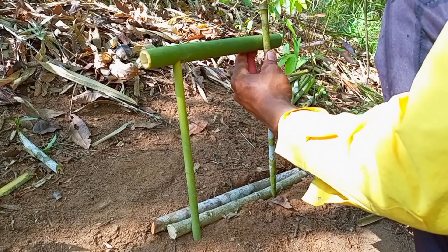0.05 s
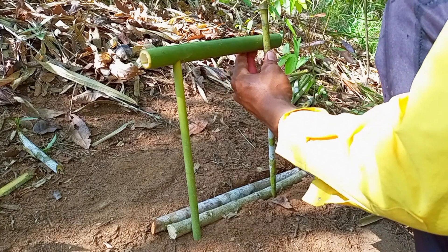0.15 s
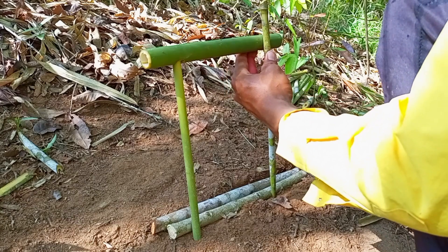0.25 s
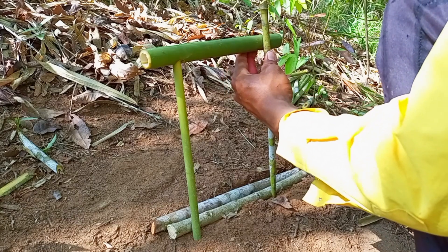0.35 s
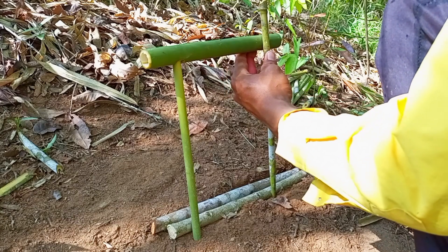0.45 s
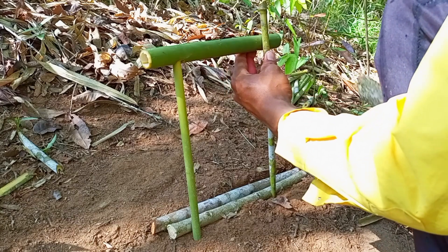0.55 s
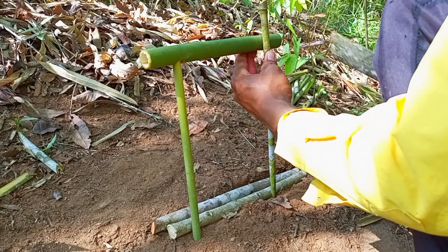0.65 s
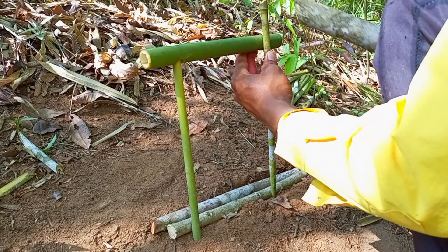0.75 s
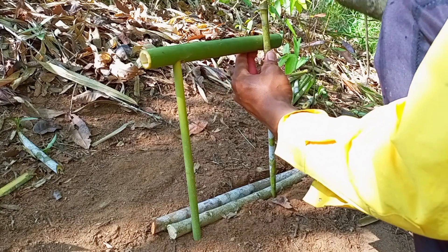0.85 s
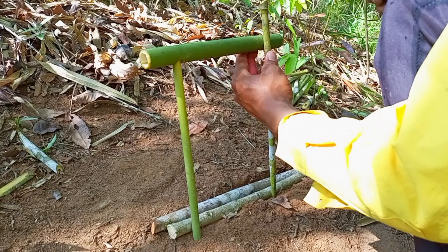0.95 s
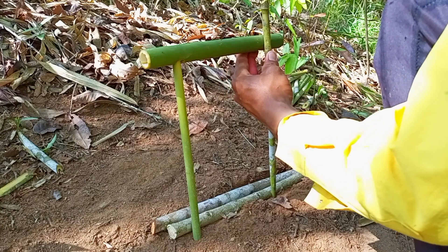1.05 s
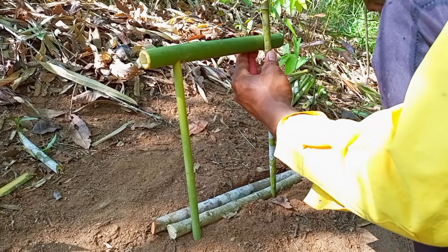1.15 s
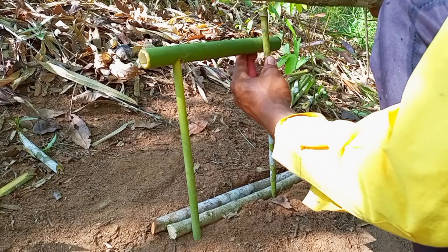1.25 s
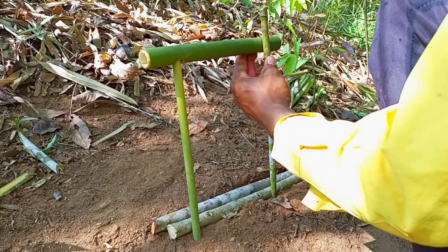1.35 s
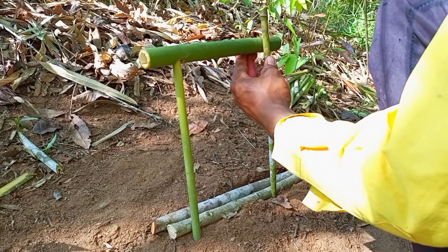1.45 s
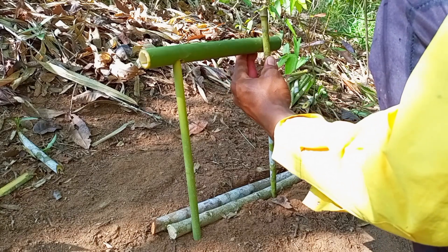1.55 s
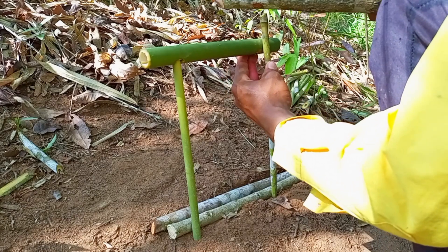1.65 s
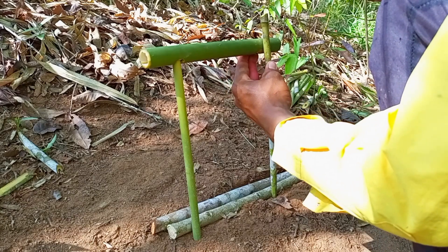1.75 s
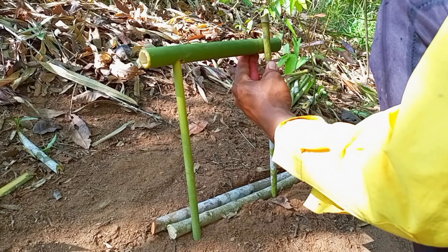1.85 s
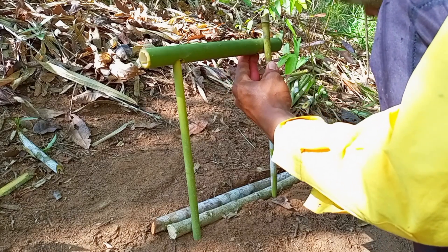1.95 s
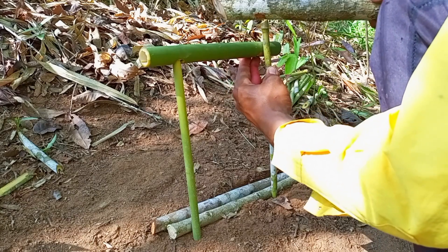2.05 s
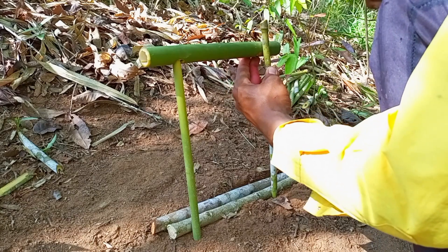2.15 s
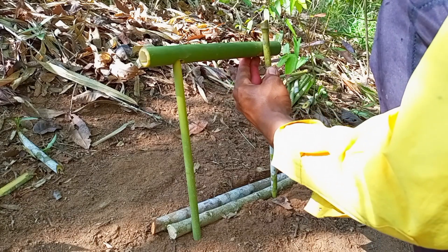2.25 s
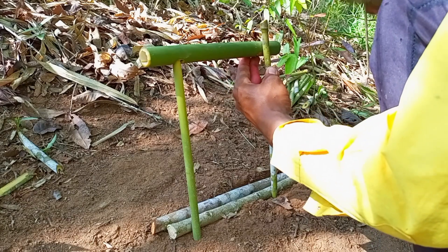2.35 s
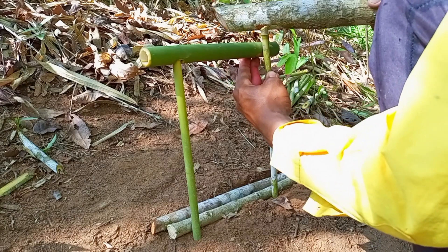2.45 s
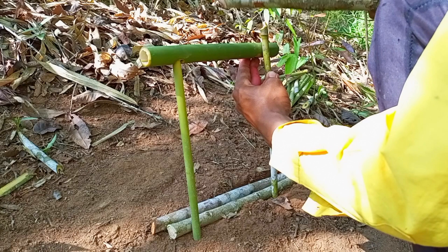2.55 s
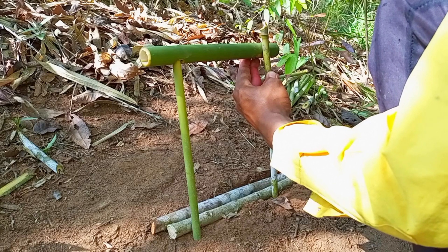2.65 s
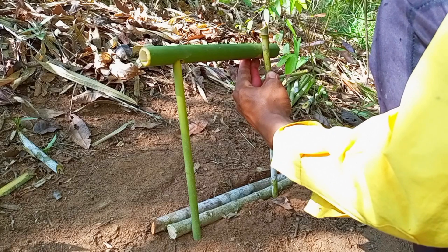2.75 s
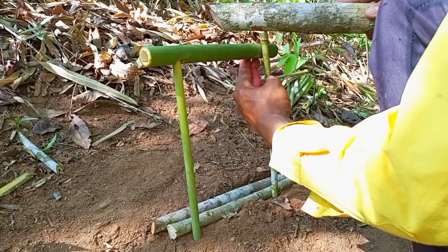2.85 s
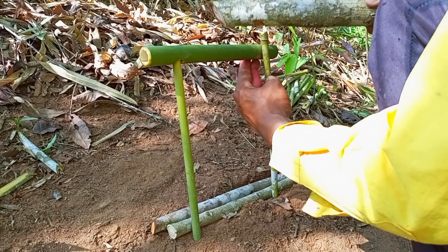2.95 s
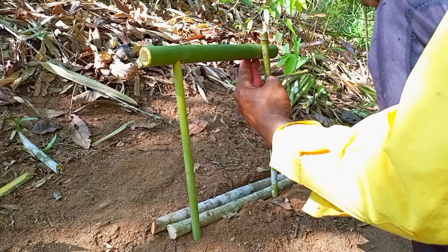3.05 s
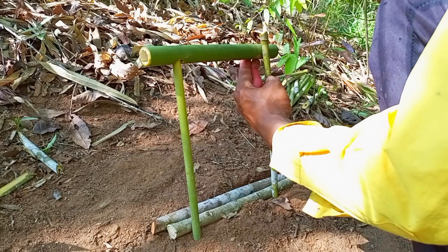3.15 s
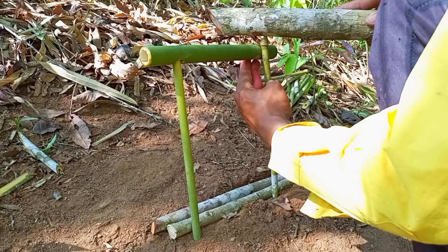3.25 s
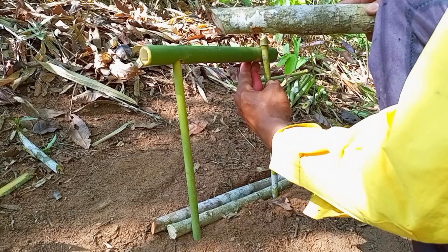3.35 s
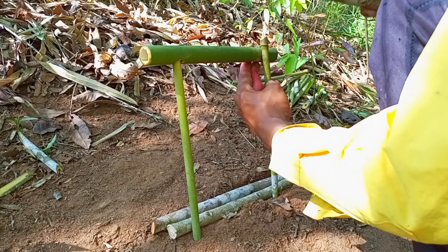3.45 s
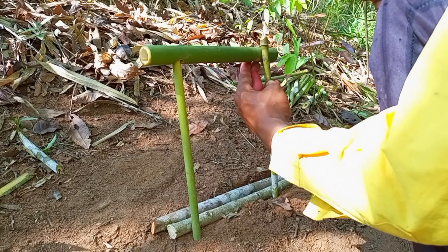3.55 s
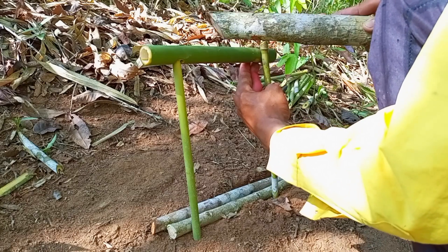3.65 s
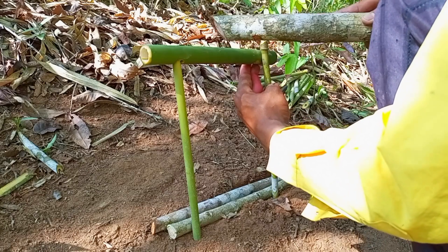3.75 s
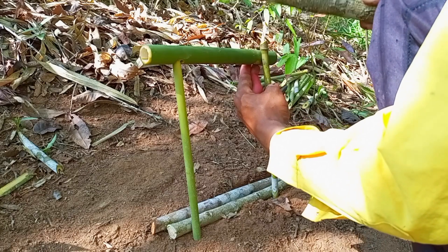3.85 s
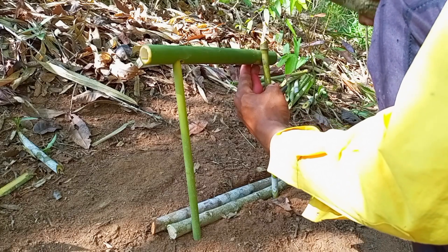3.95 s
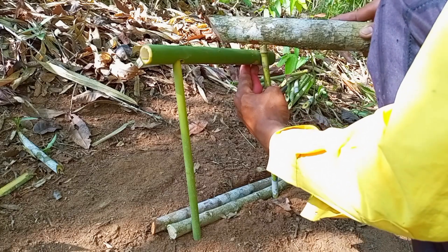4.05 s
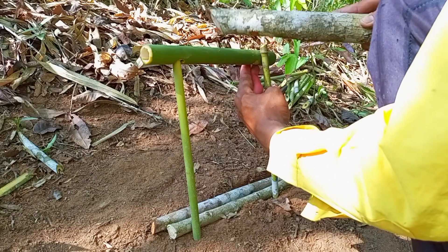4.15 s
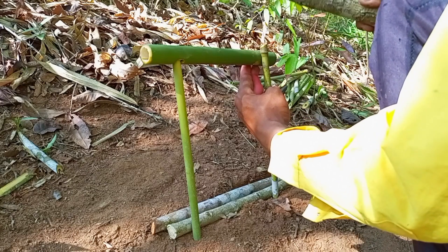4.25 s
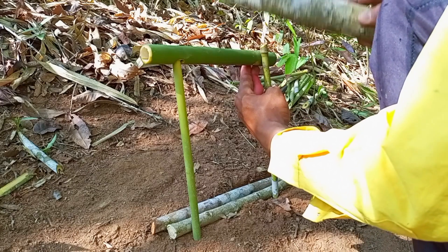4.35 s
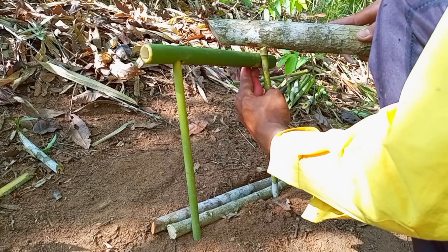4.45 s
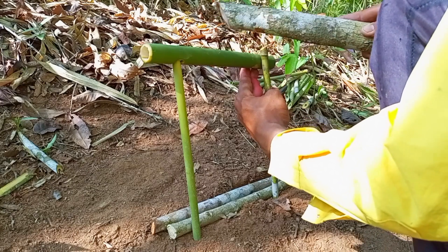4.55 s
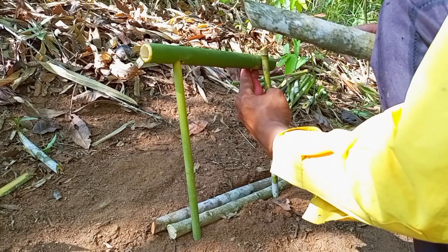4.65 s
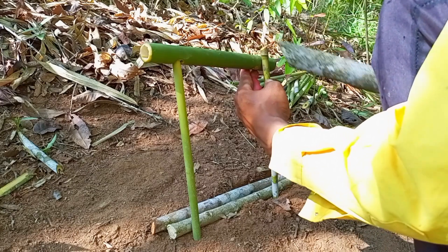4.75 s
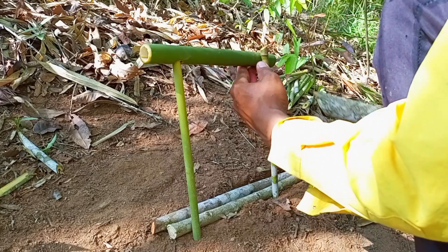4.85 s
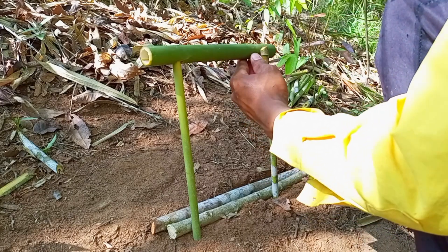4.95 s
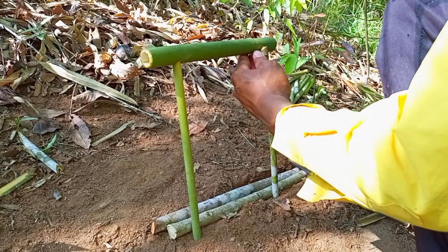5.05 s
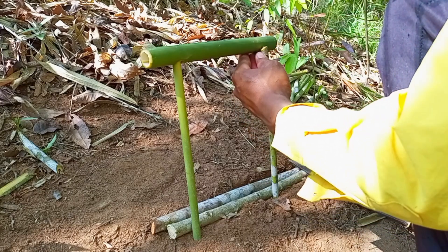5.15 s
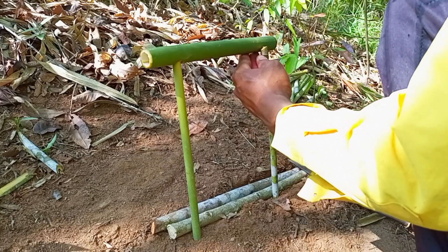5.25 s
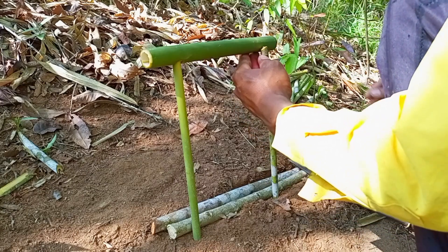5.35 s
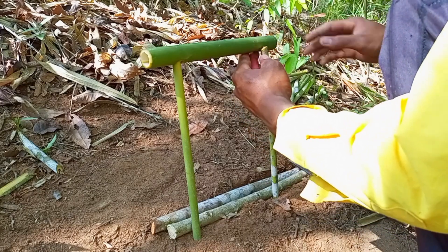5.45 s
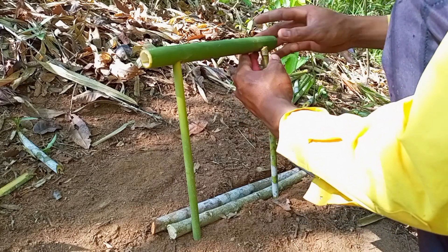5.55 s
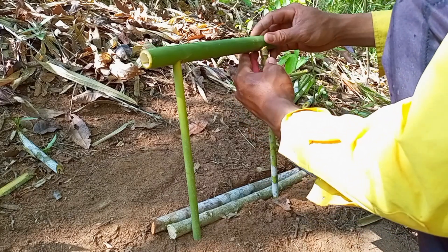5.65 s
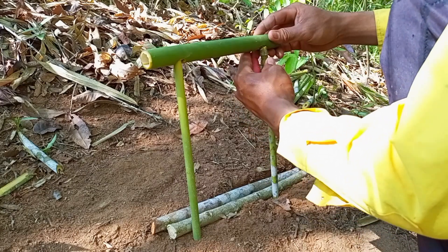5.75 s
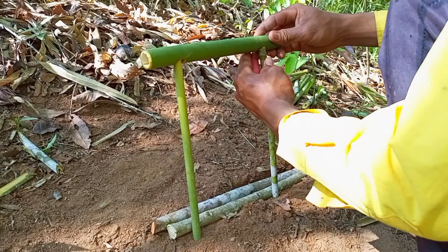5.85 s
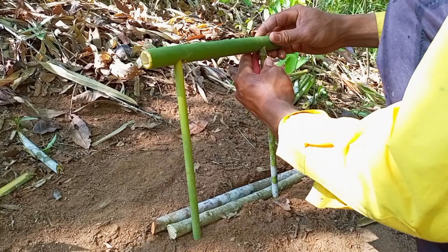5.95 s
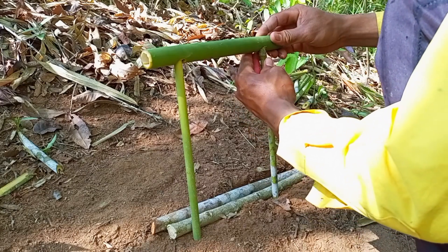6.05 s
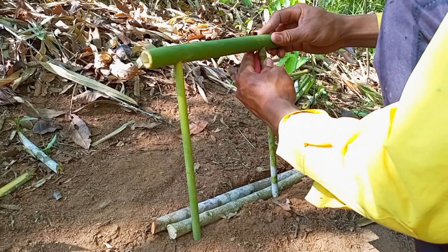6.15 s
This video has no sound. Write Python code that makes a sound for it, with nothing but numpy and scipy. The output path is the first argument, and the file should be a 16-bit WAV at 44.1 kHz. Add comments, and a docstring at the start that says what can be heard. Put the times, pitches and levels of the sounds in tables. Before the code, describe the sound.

In a forest filled with a steady, high cicada drone, nine close, evenly spaced knocks of wood on bamboo ring out with hardly any echo. They start lighter, then gain force and a deeper thud, with small ticks and dull bumps from a loose crossbar. The hammering stops, and the crossbar slips over the stake with a short scrape and a click. Distant birds call very faintly.

```python
"""Nine even knocks, each a hollow clack over a thud, stand out from a steady hiss of cicadas.
A wooden club drives a green bamboo stake of a small frame into forest soil: each impact excites
damped modes of the cane, and the stake's sway against the soil gives the thud. The held crossbar
rattles and bumps after the blows; after a faint ringing tick it is pushed up over the stake with a
scrape and a click. Far birds call faintly, and ground and trunks scatter a short tail."""
import sys
import numpy as np
from scipy import signal
from scipy.fft import rfft, irfft, next_fast_len
from scipy.io import wavfile
from scipy.ndimage import uniform_filter1d, map_coordinates

SR = 44100
rng = np.random.default_rng(int(sys.argv[2]) if len(sys.argv) > 2 else 0)


def store_pcm(level_fs):
    """Save levels as 16-bit WAV."""
    pcm = np.round(np.clip(level_fs, -1, 1) * 32767).astype(np.int16)
    wavfile.write(sys.argv[1], SR, np.atleast_2d(pcm).T)


N = 273861

# club blows: (time [s], force [dB], tube level [dB re force], tube frequency [Hz],
# crossbar hum [dB re force], crossbar rebound delay [s])
BLOWS = [(1.2615, -15.5, -15, 1670, -34.5, .016), (1.674, -9.5, -10, 1680, -45, .015),
         (2.0569, -6.5, -10.5, 1740, -41, 0.052), (2.4647, -5.5, -22, 1400, -31, 0.038),
         (2.8902, -5, -18.5, 1426, -37.5, 0.043), (3.3017, -0.5, -15.5, 1870, -38.5, 0.03),
         (3.7085, -2.5, -24, 1850, -40, .035), (4.089, -3, -18, 1842, -33, 0.038),
         (4.4626, -4, -23, 1738, -43, 0.028)]
# modes of the stake's walls, its bending and the crossbar's air column:
# (frequency [Hz], level [dB], T60 [s])
WALL_MODES = [(607, -18, 0.017), (757, -12, 0.019), (1030, -2.2, 0.024), (1317, -11, 0.014),
              (1448, -17.5, 0.036), (2204, -24.5, 0.039), (2440, -30, 0.066), (3050, -23, 0.033),
              (3510, -30, 0.061), (4535, -17.5, 0.025)]
BENDING_MODES = [(405.2, 6.5, .018), (439, -17, .09), (743, -10, 0.016)]
AIR_COLUMN_MODES = [(1006.4, 4, 0.086), (1087, 1, 0.12)]
# the stake's sway against the soil: (frequency [multiple of thud pitch], level [dB], T60 [s])
SWAY_MODES = [(0.99, 0.04, 0.058), (1.38, -11, 0.048), (2.4, 7.5, 0.01)]
# contact noise of club on cane: (frequency [Hz], level [dB])
CRACK_SPECTRUM = [(200, -9), (700, -9.5), (1400, -2.5), (2200, -6), (3200, -16.5), (3900, -12),
                  (4600, -13.5), (6000, -17), (10000, -15), (15500, -23)]


def knocks(loose_hz=172, seated_hz=109, blows_to_seat=3.03):
    """Impact excites free vibration; the thud deepens as the stake sinks, then gains on the clack."""
    out, t = np.zeros(N), np.arange(SR // 4) / SR
    driven = 0  # counted in full blows of 0 dB
    for s, force_db, tube_db, tube_hz, hum_db, _ in BLOWS:
        driven += amp(force_db)
        thud_hz = np.interp(driven, [0, blows_to_seat], [loose_hz, seated_hz])
        wedged = max(driven - blows_to_seat, 0)  # full blows since reaching firm soil
        clack = amp(-10 - 4.5 * wedged) * ring(WALL_MODES, t, attack=0.00033, scatter_db=0.5)
        afterring = ring([(tube_hz, -32.5, 0.2)], t, attack=0.004)
        tube = amp(tube_db) * (ring([(tube_hz, 0, 0.024)], t, attack=0.0009) + afterring)
        hum = amp(hum_db) * ring(AIR_COLUMN_MODES, t, attack=0.004)
        bend = amp(-20.3) * ring(BENDING_MODES, t, attack=0.0007)
        crack_envelope = amp(-17 - 60 * t / 0.018) * (1 - np.exp(-t / 0.00093))
        crack = crack_envelope * noise(CRACK_SPECTRUM, size=len(t))
        sway = ring([(ratio * thud_hz, db, t60) for ratio, db, t60 in SWAY_MODES], t, attack=0.002)
        thud = amp(-21 + 1.1 * force_db + 4 * wedged) * sway
        add(out, s, thud + amp(force_db) * (bend + clack + tube + hum + crack))
    return out


# ticks of bamboo against bamboo: (time [s], level [dB])
TICKS = [(2.0728, -28), (2.4780, -35.5), (2.536, -50.5), (2.9060, -34.5), (3.745, -54), (3.781, -44.5)]
# the cane's hard skin: (frequency [Hz], level [dB], T60 [s])
SKIN_MODES = [(1076, -7.5, .06), (2250, -7.5, 0.043), (3140, -21, .05), (3350, -6.5, .03),
              (4150, -10, 0.056), (4720, -2.5, 0.013)]
# cane rubbing on cane, in both rattle and slide: (frequency [Hz], level [dB])
FRICTION_SPECTRUM = [(200, -24.5), (400, -22.5), (560, -3.5), (850, -17.5), (1600, -0.5), (2600, -4.5),
                     (4000, 2.5), (9000, -3.5), (15500, -9.5)]


def rattle():
    """Brief contacts of the loose crossbar with the stake excite skin modes and friction noise."""
    out, t = np.zeros(N), np.arange(SR // 4) / SR
    for s, db in TICKS:
        grit = amp(-5 - 60 * t / 0.049) * noise(FRICTION_SPECTRUM, size=len(t))
        add(out, s, amp(db) * (ring(SKIN_MODES, t, attack=0.0011, scatter_db=1.5) + grit))
    return out


def slide(crest_s=5.227, rise_s=0.026, fall_s=0.047, click_s=5.2305, release_s=5.25):
    """Sliding friction swells until the crossbar clicks over the tip; the freed stake rings briefly."""
    t = np.arange(N) / SR
    from_crest = np.maximum((crest_s - t) / rise_s, (t - crest_s) / fall_s)
    stroke = amp(-42 - 26.7 * from_crest + 2.3 * wobble(320))
    scrape = stroke * noise(FRICTION_SPECTRUM)
    click_envelope = (t >= click_s) * amp(-23.5 - 60 * np.abs(t - click_s) / 0.006)
    click = click_envelope * noise([(2000, -22), (6000, -10), (9500, 4), (15500, -7.5)])
    out = scrape + click
    add(out, release_s, ring([(437, -63, 0.23)], t[:SR // 4], attack=0.012))
    return out


# the palm's cushioned response: (frequency [multiple of contact pitch], level [dB], T60 [s])
PALM_MODES = [(.65, 0.5, .07), (1.001, 6, 0.051), (1.5, -1.5, 0.048)]
# the hand pushes the crossbar upward: (time [s], level [dB])
HAND_PUSHES = [(5.095, -50), (5.25, -39.5), (5.317, -71)]


def palm_bumps(rebound_hz=166, push_hz=135):
    """Compliant contact: flesh takes the crossbar's load gradually, so rebounds and pushes are dull."""
    out, t = np.zeros(N), np.arange(SR // 4) / SR
    cushion = 1 - np.exp(-t / 0.0016)

    def bump(hz):
        modes = [(ratio * hz, db, t60) for ratio, db, t60 in PALM_MODES]
        return cushion * ring(modes, t, attack=0.00408)

    for s, force_db, *_, rebound_s in BLOWS:
        add(out, s + rebound_s, amp(force_db - 33.5) * bump(rebound_hz))
    for s, db in HAND_PUSHES:
        add(out, s, amp(db) * bump(push_hz))
    return out


def sleeve(peak_s=6.0, width_s=0.089, db=-82):
    """Cloth friction gives a soft swell of noise as the free hand takes hold of the crossbar."""
    swell = np.exp(-((np.arange(N) / SR - peak_s) / width_s) ** 2)
    return amp(db) * swell * noise([(30, 8), (170, 2), (600, -8), (2000, -13.5), (5000, -27.5)])


# low, middle and top bands of the chorus: (frequency [Hz], level [dB])
BUZZ_SPECTRUM = [(3850, -50), (4200, -16), (4450, -14), (4650, -20), (5000, -5.5), (5500, -1), (6000, -1.5),
                 (6700, 1), (7200, 0.5), (7700, -10.5), (8500, -30)]
DRONE_SPECTRUM = [(5000, -70.5), (6800, -25.5), (7300, -12), (7700, -3.5), (8300, -3), (9250, 0.5),
                  (10200, -4), (11300, -11.5), (12500, -31)]
SIZZLE_SPECTRUM = [(10500, -35.5), (11800, 5.5), (12600, 3), (13400, 6), (14300, -1.5), (15400, -8)]


def cicada_chorus(ease_from_s=2.7, ripple_db=2.5):
    """Countless incoherent sources sum to a hiss, which slowly eases off, fastest at the top."""
    easing_s = np.maximum(np.arange(N) / SR - ease_from_s, 0)

    def bunching(hz):
        """Pitches cluster at random, leaving fine steady lines in the spectrum."""
        return amp(ripple_db * map_coordinates(rng.standard_normal(SR // 20), [hz / 24], mode="wrap"))

    def swarm(spectrum, db, fade_db_per_s):
        envelope = amp(db - fade_db_per_s * easing_s + 0.36 * wobble(25))
        return envelope * unit(filtered(noise(spectrum), bunching))

    return (swarm(BUZZ_SPECTRUM, db=-53, fade_db_per_s=1.15)
            + swarm(DRONE_SPECTRUM, db=-44, fade_db_per_s=0.3)
            + swarm(SIZZLE_SPECTRUM, db=-53.6, fade_db_per_s=2.5))


# single insects that stand out: (frequency [Hz], bandwidth [Hz], level [dB])
CICADA_BANDS = [(4230, 56, -85), (5575, 16, -71.5), (7099, 17, -70.5), (7640, 20, -62), (7746, 35, -63.5),
                (7905, 60, -63), (8032, 25, -66.5), (8690, 18, -64), (9000, 86, -63.5), (9232, 37, -58),
                (9460, 60, -61.5), (9800, 16, -68.5)]
# one low cicada swells and fades: (time [s], level [dB])
SOLO_ENVELOPE = [(0, -86), (1.1, -77), (2.4, -77), (3.9, -85.5), (4.7, -86), (5.4, -71.5), (5.7, -76.5),
                 (6.2, -79)]


def near_cicadas(solo_hz=4447, solo_width_hz=26):
    """Narrow-band noise is heard as a wavering pitch: one band for each nearer insect."""
    def bell(hz, centre, half_width):
        """A Gaussian band of unit power."""
        return np.exp(-((hz - centre) / half_width) ** 2) * SR / (2 * np.sqrt(np.pi) * half_width)

    def sing(bands):
        power = lambda hz: sum(amp(db) ** 2 * bell(hz, centre, width / 2) for centre, width, db in bands)
        return filtered(rng.standard_normal(N), lambda hz: np.sqrt(power(hz)))

    swell = amp(np.interp(np.arange(N) / SR, *np.transpose(SOLO_ENVELOPE)))
    solo = swell * sing([(solo_hz, solo_width_hz, 0)])
    return solo + sing(CICADA_BANDS)


# eight far bird calls, then a faint ringing bamboo tick just before the crossbar is pushed up:
# (peak time [s], level [dB], frequency [Hz], duration [s])
CALLS_AND_TICK = [(0.092, -74, 990, 0.025), (.85, -80, 1020, 0.026), (1.545, -75, 3060, 0.041),
                  (1.625, -73, 1014, 0.04), (1.78, -77, 2800, 0.053), (2.687, -74, 3480, 0.053),
                  (3.215, -80, 3630, 0.05), (4.681, -84.5, 3200, 0.046), (5.063, -75, 3410, .04)]


def calls_and_tick(blur_hz=130):
    """Random amplitude modulation broadens brief tones: far bird calls and one ringing bamboo tick."""
    out, t = np.zeros(N), np.arange(N) / SR
    blur = unit(wobble(blur_hz))
    for s, db, hz, duration in CALLS_AND_TICK:
        envelope = amp(db) * np.exp(-2 * ((t - s) / duration) ** 2)
        out += envelope * blur * np.sin(2 * np.pi * hz * t)
    return out


# the continuous twitter of far birds: (frequency [Hz], level [dB])
TWITTER_SPECTRUM = [(2300, -30.5), (2800, -1.5), (3150, 0.5), (3500, -7.5), (3900, -24)]


def twitter(db=-92, patchy_db=5):
    """Modulation in time and frequency breaks a band of noise into a patchy twitter."""
    spectrogram = signal.stft(noise(TWITTER_SPECTRUM), nperseg=1024)[2]
    across_pitch = uniform_filter1d(rng.standard_normal(spectrogram.shape), size=5, axis=0)
    patches = unit(uniform_filter1d(across_pitch, size=8, axis=1))
    return amp(db) * unit(signal.istft(spectrogram * amp(patchy_db * patches), nperseg=1024)[1][:N])


# still forest air: (frequency [Hz], level [dB])
AIR_SPECTRUM = [(20, -0.5), (60, 3), (150, 4), (350, -1), (900, -8), (2200, -6), (3150, -9), (3800, -14),
                (4500, -9)]


def air(db=-86.5):
    """Ambient noise forms a broadband floor whose level drifts slightly."""
    return amp(db + 0.8 * wobble(4)) * noise(AIR_SPECTRUM)


# reverberation time of the forest: (frequency [Hz], T60 [s])
FOREST_T60 = [(100, 0.14), (500, .09), (1500, 0.17), (4000, 0.24), (12000, 0.05)]


def trees(x):
    """Scattering from ground and trunks adds a short diffuse tail, a new one for each block of sound."""
    out, block = np.zeros(N), SR * 2 // 5
    for start in range(0, N, block):
        hz, t, spectrogram = signal.stft(rng.standard_normal(SR // 3), SR, nperseg=256)
        decay = amp(-60 * t / along(FOREST_T60, hz)[:, None])
        onset = 1 - np.exp(-t / 0.0069)
        tail = signal.istft(spectrogram * decay * onset, SR, nperseg=256)[1]
        add(out, start / SR, signal.fftconvolve(x[start:start + block], tail / np.linalg.norm(tail)))
    return out


def ring(modes, t, attack, scatter_db=0):
    """Modal superposition: damped sines of alternating sign, their levels varied by scatter_db."""
    tones = 0
    for k, (hz, db, t60) in enumerate(modes):
        decay = amp(db + scatter_db * rng.standard_normal() - 60 * t / t60)
        tones += (-1) ** k * decay * np.sin(2 * np.pi * hz * t)
    return tones * (1 - np.exp(-t / attack))


def noise(spectrum, size=N):
    """Spectral shaping turns white noise into coloured noise of rms 1."""
    return unit(filtered(rng.standard_normal(size), lambda hz: amp(along(spectrum, hz))))


def filtered(x, response):
    """Linear filtering multiplies the spectrum by a frequency response."""
    size = next_fast_len(len(x) + 8192)
    return irfft(rfft(x, size) * response(np.fft.rfftfreq(size, 1 / SR)), size)[:len(x)]


def along(points, hz):
    """Interpolation of (frequency [Hz], value) points on a logarithmic frequency axis."""
    frequencies, values = np.transpose(points)
    return np.interp(np.log(hz + 1), np.log(frequencies + 1), values)


def wobble(rate):
    """Smooth random modulation: a spline through rate knots a second."""
    return map_coordinates(rng.standard_normal(int(N * rate / SR) + 4), [np.arange(N) * rate / SR])


def amp(db):
    """Decibels to amplitude ratio."""
    return 10 ** (np.asarray(db) / 20)


def unit(x):
    """Normalisation to rms 1."""
    return x / np.sqrt(np.mean(x ** 2) + 1e-20)


def add(track, s, sound):
    """Superposition of a sound on the track at time s."""
    start = round(s * SR)
    track[start:start + len(sound)] += sound[:N - start]


def scene():
    """Pressures add: the nearby frame, its reverberation and the forest all round."""
    frame = knocks() + rattle() + palm_bumps() + slide()
    close = frame + amp(-24) * trees(frame) + sleeve()
    return (close + cicada_chorus() + near_cicadas() + air() + twitter() + calls_and_tick())[None]


def record(dry, low_hz=70, top_hz=15560):
    """Band limiting: the microphone sheds deep bass and passes nothing above its upper limit."""
    thin = signal.sosfilt(signal.butter(4, low_hz, "highpass", fs=SR, output="sos"), dry[0])
    return filtered(thin, lambda hz: hz < top_hz)[None]


dry = scene()
out = record(dry)
store_pcm(out)
```